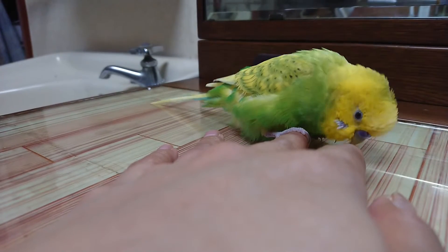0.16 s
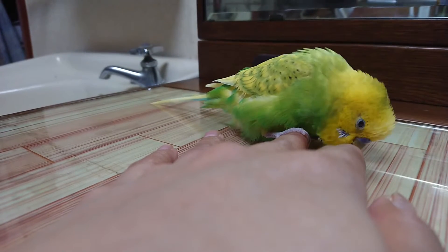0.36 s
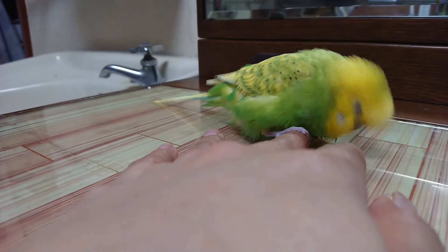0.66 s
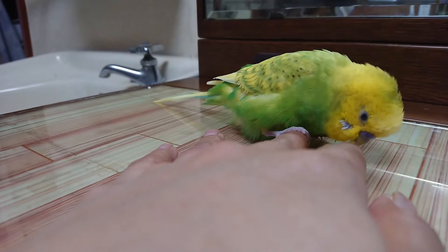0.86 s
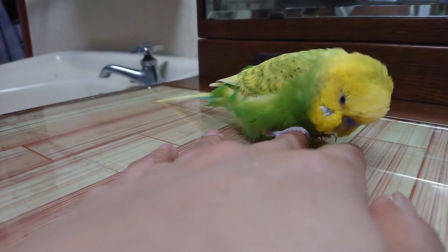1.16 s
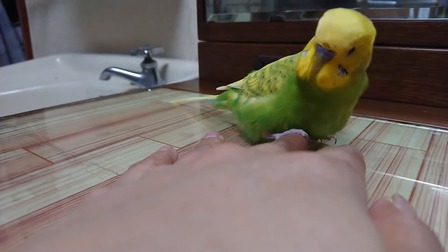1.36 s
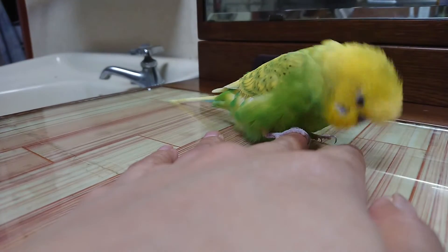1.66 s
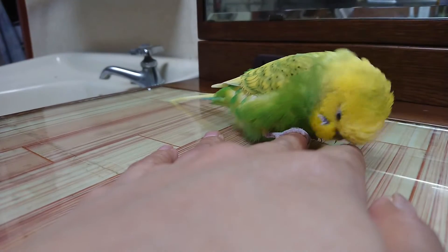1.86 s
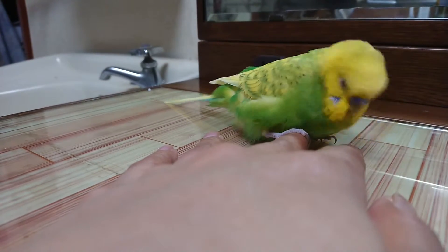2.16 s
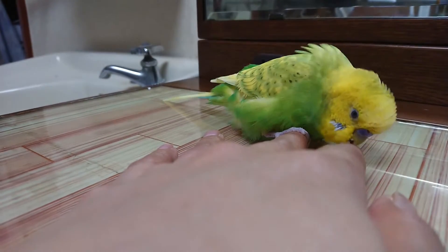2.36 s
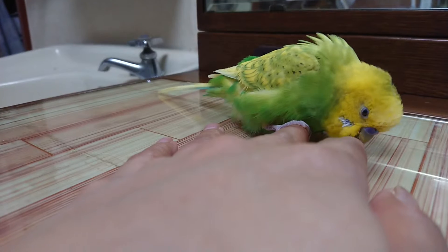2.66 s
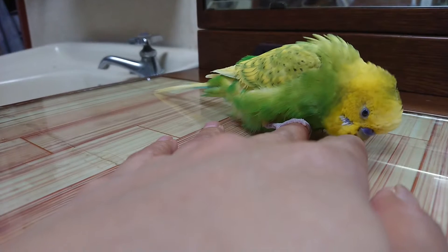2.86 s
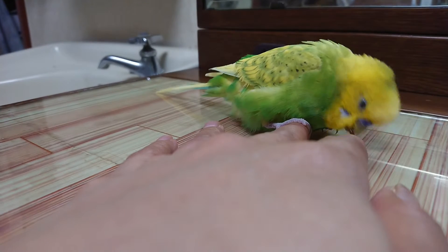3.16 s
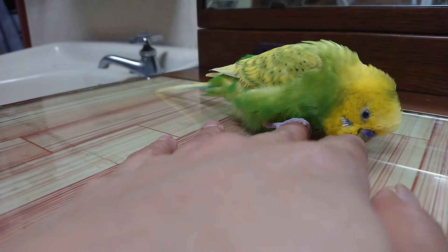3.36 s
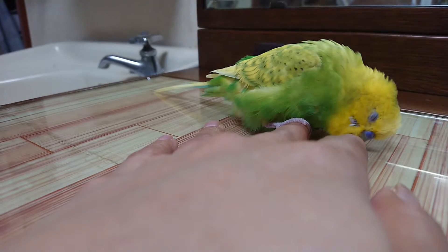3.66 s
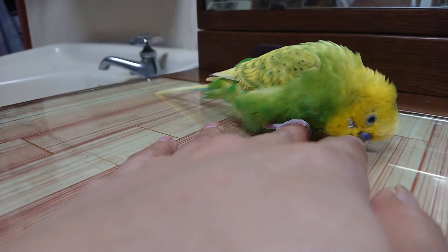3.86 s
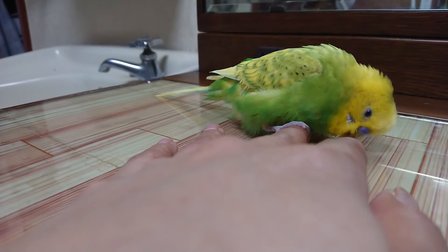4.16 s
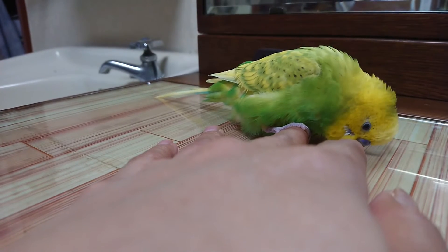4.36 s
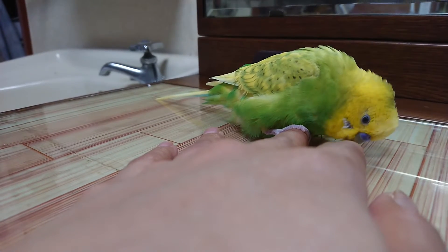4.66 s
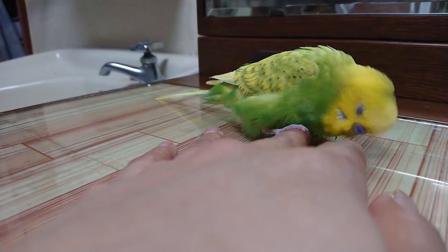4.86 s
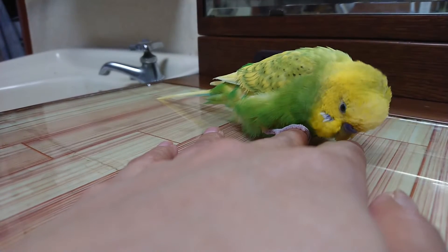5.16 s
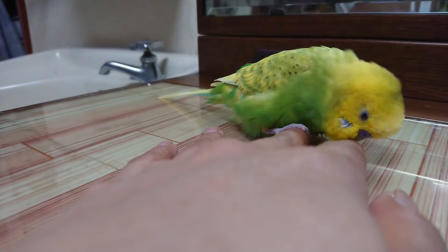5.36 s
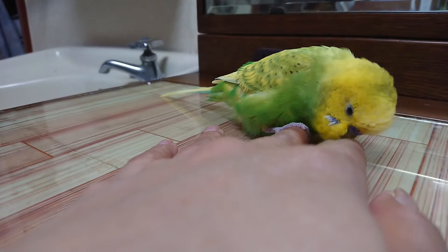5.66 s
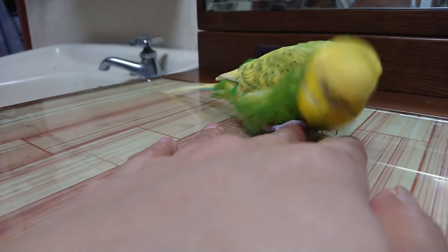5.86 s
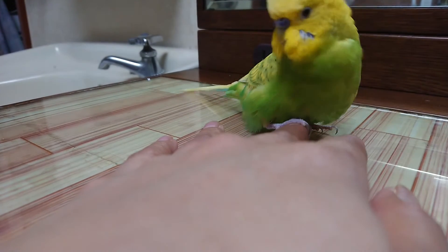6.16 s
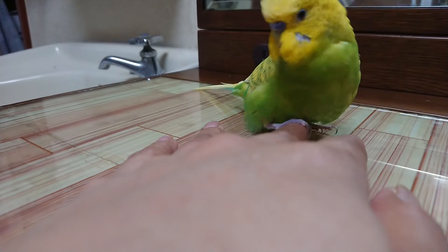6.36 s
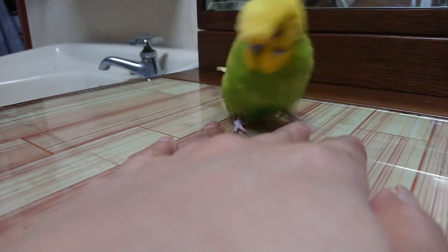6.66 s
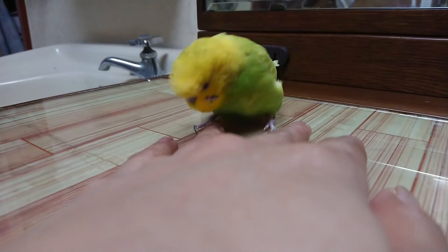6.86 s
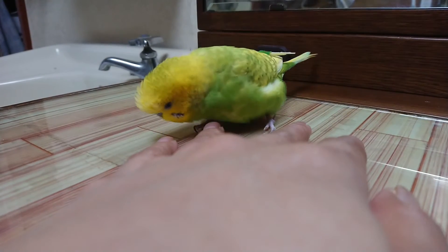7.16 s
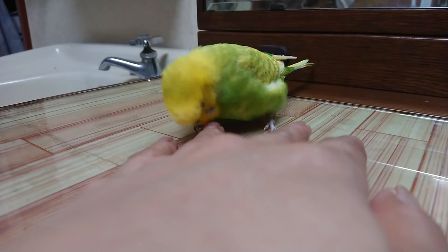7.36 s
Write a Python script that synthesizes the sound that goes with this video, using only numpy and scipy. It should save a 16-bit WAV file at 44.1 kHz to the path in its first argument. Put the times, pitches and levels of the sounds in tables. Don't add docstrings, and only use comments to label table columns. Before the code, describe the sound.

A small hard room, recorded close in stereo, with a budgerigar just to the right. From 0 to 1.5 s there are only tiny, dry nibbling ticks over a low outside rumble, while a faint engine hum rises and then slows. At 1.5 s the bird warbles until about 2.2 s: very fast, throbbing whistled glides, bright and slightly raspy, with a hollow pop. Shorter phrases follow around 2.7-3.1 s and 3.7-4.2 s, with beak clacks between and a brief grainy claw scrape at 3.4 s. From 2.3 s, other birds chirp very faintly, heard only as echo. Light ticking fills 4.4-5.3 s. A quick chatter at 5.4 s leads to two hard, loud clacks near 5.7 s. Dense, tumbling warble then runs on to about 7.1 s, pauses briefly, and ends with a clack and a bright high chirp near 7.5 s. Soft airy noise grows slightly throughout.

```python
import sys
import numpy as np
from scipy import signal
from scipy.fft import rfft, irfft
from scipy.io import wavfile
from scipy.ndimage import uniform_filter1d

SR = 44100
rng = np.random.default_rng(int(sys.argv[2]) if len(sys.argv) > 2 else 0)


def digitize_waveform(pressure):
    field = np.atleast_2d(pressure).T
    bounded = np.clip(field, -1, 1)
    quanta = np.round(bounded * 32767).astype(np.int16)
    wavfile.write(sys.argv[1], SR, quanta)


def invert_db(level):
    return 10 ** (np.asarray(level, dtype=float) / 20)


N = 331191

# t/s, length/ms, shift/semitones, level/dB, swell/dB
DIP_SHAPE = [
    (.02, 4350, 3460, 2875, -9.5),
    (.2, 2700, 2864, 3326, 1.9),
    (.43, 3900, 4500, 4700, -12),
    (.54, 4267, 3702, 3750, -3),
]
DIPS_SUNG = [
    (1.5439, 58, 0.22, -27, 9),
    (2.698, 64, 0.36, -23, 5),
    (3.7107, 65, 0.31, -26, -6),
]
SWOOP_SHAPE = [
    (0, 3760, 2262, 2160, 5.5),
    (.62, 2117, 2756, 3410, 10),
]
SWOOPS_SUNG = [
    (1.601, 35, -0.13, -35.5, 0.5),
    (2.7613, 29.9, -0.19, -32, 3.5),
    (3.7741, 28.6, -0.18, -33.5, 5.5),
    (5.859, 30, 0.34, -35, 4),
    (6.597, 25.5, 0.096, -33, -4),
]
LEAD_SHAPE = [
    (0.09, 3730, 3140, 3900, -1.5),
]
LEADS_SUNG = [
    (1.7244, 26, 0.08, -20, 6),
    (2.892, 27, 0.087, -23, 1.5),
    (3.925, 31, 0.0091, -29.5, 4.5),
]
ZIGZAG_SHAPE = [
    (0, 3270, 2876, 3190, 1),
    (.24, 2267, 2410, 3043, -2.5),
    (.5, 2880, 2750, 3100, 1),
    (.63, 3618, 3450, 3250, 6),
]
ZIGZAGS_SUNG = [
    (2.9221, 64.8, -0.0019, -27, -7.5),
    (3.955, 76, .1, -33, -11.5),
]
STAIR_SHAPE = [
    (0, 2540, 1723, 1853, -8),
    (.19, 1850, 1413, 1450, -6.5),
    (.38, 1660, 1964, 2120, -3),
    (.47, 2138, 2445, 2420, 4),
    (.58, 2250, 1950, 1935, -3),
    (.7, 2355, 2958, 2980, 3.2),
    (.85, 3254, 2914, 2810, 9),
]
STAIRS_SUNG = [
    (2.056, 105.4, -0.86, -29, -8),
    (2.985, 111.5, 0.72, -29, 0),
]
# t/s, length/ms, start f/Hz, end f/Hz, level/dB
LINK_NOTES = [(6.031, 5.9, 2500, 1960, -29), (1.8185, 27.5, 1825, 1223, -29.5),
              (1.8569, 12, 2816, 2947, -14.5), (1.868, 8, 2774, 2424, -9.5), (1.875, 11, 2500, 2826, -19),
              (1.8852, 37, 2791, 2677, -27.5), (1.9176, 23, 2856, 2860, -25.5),
              (1.9346, 46, 3350, 3500, -30.5), (4.0451, 43, 2914, 2887, -29), (4.085, 35, 2874, 3118, -25),
              (5.586, 12, 2464, 3180, -28), (6.137, 13, 2370, 2790, -33.5), (7.4216, 10, 2783, 2710, -27),
              (7.4905, 9.6, 1450, 1310, -33.5)]
# t/s, length/ms, start f/Hz, end f/Hz, level/dB
MORE_LINK_NOTES = [(1.75, 5.4, 3480, 2360, -22), (1.758, 7.3, 1990, 2740, -21.5), (1.767, 13, 2880, 3346, -24.5),
                   (1.7798, 12, 3000, 2665, -17), (1.766, 2.3, 2097, 1400, -29), (1.845, 8.7, 1381, 1970, -29),
                   (6.098, 10, 2030, 2380, -35), (6.1112, 15, 1830, 1640, -36), (6.122, 18.6, 1510, 1250, -37.5),
                   (6.154, 2.8, 2790, 2330, -22), (4.03, 8.2, 1816, 1670, -46.5), (4.057, 5.7, 1385, 1450, -42),
                   (4.066, 28, 1789, 2510, -36.5), (4.092, 17, 2040, 1980, -36),
                   (4.101, 14.5, 2215, 2874, -27.5), (4.118, 20, 3102, 2594, -17),
                   (4.142, 22.2, 2928, 3400, -31.5), (1.721, 4.4, 3500, 3650, -36.5),
                   (2.887, 4.4, 3625, 3730, -44)]
# t/s, length/ms, start f/Hz, end f/Hz, level/dB
EARLY_WARBLE = [(1.7904, 9.9, 3770, 3830, -20), (1.797, 4.2, 3400, 3500, -24.5),
                (1.8, 16.4, 3495, 3830, -17), (1.974, 4.9, 3330, 3270, -22.5),
                (1.982, 13.2, 3380, 2217, -20), (1.991, 21, 2300, 2510, -22.5),
                (2.009, 2.6, 2500, 3500, -30), (2.01, 7.7, 3550, 3500, -19), (2.017, 13, 3480, 2910, -18.5),
                (2.028, 15, 3150, 3230, -26.5), (2.037, 8, 3350, 3736, -20), (2.043, 4.3, 3740, 3500, -16),
                (2.051, 8.6, 3150, 1940, -41.5), (5.418, 9.2, 2850, 1720, -31),
                (5.426, 8.4, 1830, 1650, -32), (5.436, 9.3, 1890, 2500, -27.5),
                (5.444, 7, 2690, 3400, -31.5), (5.454, 12, 3136, 2430, -24), (5.464, 11, 2580, 2980, -26),
                (5.477, 3.9, 2930, 3840, -19), (5.483, 4.1, 3500, 3360, -27), (5.489, 6.7, 2620, 2070, -35),
                (5.496, 14.4, 1523, 1880, -32.5), (5.518, 16, 1585, 1375, -36.5),
                (5.53, 15.4, 1860, 2430, -29.5), (5.547, 5.9, 2470, 2330, -24.5),
                (5.555, 8.8, 2420, 3010, -26.5), (5.562, 10.6, 2824, 2500, -19),
                (5.572, 6.7, 2630, 3070, -28.5), (5.804, 14, 4060, 2950, -30.5),
                (5.813, 9.9, 3000, 3150, -26.5), (5.821, 4.1, 2980, 3480, -25.5),
                (5.838, 31.5, 4074, 3830, -30), (5.857, 4.2, 3970, 3530, -27)]
# t/s, length/ms, start f/Hz, end f/Hz, level/dB
MIDDLE_WARBLE = [(5.997, 7.3, 3160, 3120, -37), (6.003, 8, 3180, 3570, -38), (6.012, 8, 3500, 2650, -39),
                 (6.018, 13.3, 2680, 2500, -22), (6.038, 4.2, 2820, 3500, -26),
                 (6.048, 8.1, 3280, 3060, -29.5), (6.057, 5.2, 3720, 3680, -27),
                 (6.064, 11.5, 3565, 3620, -35), (6.075, 6.2, 3440, 3350, -28),
                 (6.139, 11.7, 1184, 1395, -35.5), (6.16, 3, 2280, 2240, -26), (6.166, 11, 2105, 1880, -31),
                 (6.177, 10, 2124, 2340, -28), (6.187, 5.1, 2350, 2760, -36),
                 (6.204, 2.3, 2500, 2940, -32.5), (6.218, 26.6, 1450, 1210, -34.5),
                 (6.238, 14.8, 1246, 1650, -34), (6.256, 12.4, 1400, 1556, -36.5),
                 (6.268, 11, 2200, 1960, -33), (6.279, 15.6, 2500, 2670, -19.5),
                 (6.296, 12, 1885, 1840, -34), (6.307, 9.6, 2010, 2450, -26.5),
                 (6.319, 30, 1824, 1200, -41.5), (6.368, 4.2, 1600, 1580, -37),
                 (6.375, 16, 1450, 1730, -38.5), (6.39, 6.4, 2220, 2400, -28),
                 (6.399, 12, 2580, 2620, -19.5), (6.413, 9.8, 1837, 2070, -28.5),
                 (6.426, 15.7, 1994, 2800, -27), (6.443, 2.8, 2750, 2670, -20),
                 (6.456, 12, 3240, 2810, -31), (6.539, 13.5, 4310, 2880, -33),
                 (6.548, 3, 2770, 2700, -17.5), (6.55, 9.7, 2670, 3040, -19.5),
                 (6.562, 7.4, 4180, 4550, -43.5), (6.573, 15.3, 4100, 3645, -33),
                 (6.586, 8.5, 3930, 3810, -30)]
# t/s, length/ms, start f/Hz, end f/Hz, level/dB
LATE_WARBLE = [(6.727, 11, 3280, 3220, -43), (6.739, 4.8, 3210, 3500, -34), (6.75, 2.6, 2500, 2500, -30),
               (6.755, 9.2, 2515, 2300, -20), (6.762, 5.2, 2180, 1540, -32), (6.766, 3.8, 3800, 3500, -33),
               (6.77, 2.9, 2800, 3400, -20), (6.777, 5.9, 3127, 2970, -22.5),
               (6.783, 6.7, 2850, 3320, -28.5), (6.788, 17, 4010, 3630, -23),
               (6.797, 18, 3590, 3640, -29.5), (6.815, 13, 3470, 2593, -41.5),
               (6.822, 6.3, 1880, 1780, -32.5), (6.829, 8.6, 1880, 2110, -37), (6.845, 14, 1640, 1360, -31),
               (6.858, 15, 1980, 1856, -31), (6.869, 9.6, 2300, 2610, -26), (6.879, 17, 2230, 2155, -31),
               (6.891, 19, 2590, 2810, -29.5), (6.92, 5.8, 2900, 4150, -31), (6.934, 26, 1494, 1202, -37.5),
               (6.943, 16, 1215, 1450, -31), (6.954, 14, 1450, 1245, -30.5), (6.968, 26, 1277, 1516, -34),
               (6.980, 12.3, 1462, 1450, -34), (6.996, 10, 2080, 1950, -37.5), (7.006, 13, 2500, 2500, -23),
               (7.019, 24, 1790, 1975, -33.5), (7.036, 8, 2010, 2690, -29), (7.047, 7.2, 2560, 2840, -25),
               (7.066, 3, 2760, 3320, -29.5), (7.070, 9.5, 2830, 3000, -35.5),
               (7.442, 4.4, 2190, 2420, -23), (7.447, 9.8, 2500, 2680, -20.5),
               (7.455, 15.7, 2778, 2847, -29.5), (7.473, 8, 3594, 3723, -19.5),
               (7.480, 6.9, 3880, 3520, -11), (7.486, 7.1, 3800, 3800, -29.5)]


def phrases():
    notes = []
    for s, ms, start_hz, end_hz, level_db in LINK_NOTES + MORE_LINK_NOTES + EARLY_WARBLE + MIDDLE_WARBLE + LATE_WARBLE:
        notes.append((s, ms, start_hz, np.sqrt(start_hz * end_hz), end_hz, level_db))
    syllables = (
        (DIP_SHAPE, DIPS_SUNG), (SWOOP_SHAPE, SWOOPS_SUNG), (LEAD_SHAPE, LEADS_SUNG),
        (ZIGZAG_SHAPE, ZIGZAGS_SUNG), (STAIR_SHAPE, STAIRS_SUNG))
    for shape, sung in syllables:
        ends = [row[0] for row in shape[1:]] + [1]
        for s, ms, semitones, level_db, swell_db in sung:
            for (share, *pitch, accent_db), end in zip(shape, ends):
                shifted = np.array(pitch) * 2 ** (semitones / 12)
                length_ms = max(end - share, .05) * ms
                note_db = level_db + accent_db + swell_db * (share - .5)
                notes.append((s + share * ms / 1000, length_ms, *shifted, note_db))
    return notes


def windpipe_db(hz, open_db):
    def near(centre_hz, spread):
        return np.exp(-(np.log(hz / centre_hz) / spread) ** 2)

    first = near(2700, 0.27)
    gain_db = 17 * first + (1 - first) * open_db
    return gain_db + 6 * near(7500, .12) + 12 * near(14500, .1)


# t/s, beak opening towards the microphone as overtone level/dB, rasp level/dB
HEAD = [(1.6, 0, -3.5), (1.76, 5, -7), (1.92, 6.5, 4), (2, 9, -4), (2.1, 3.5, -8), (2.8, 6, -1.5),
        (3.95, 8, 3), (4.06, 8, 12), (4.15, 11, -15.5), (5.5, 3.5, -5.5), (6.1, -5, -4), (7.05, -8, -7),
        (7.45, -0.5, -4.5)]


def song():
    edge_s = .0025
    open_db, rasp_db = in_time(HEAD)
    rasp = invert_db(rasp_db)
    notes = phrases()
    voice, strain = np.zeros(N), np.zeros(N)
    beat = 2 * np.pi * np.cumsum(175 * np.exp(.3 * drift(40))) / SR
    uneven, broken = drift(34), drift(240)
    haze = invert_db(rasp_db - 21) * drift(450)
    flutter = invert_db(11 * np.tanh(0.23 * rasp * drift(250))) + haze
    waver = np.exp(.012 * np.cos(beat) + .008 * rasp * drift(300))

    for (s, ms, *pitch, level_db), chance in zip(notes, rng.normal(size=(len(notes), 3))):
        at = int((s - edge_s / 2) * SR)
        n = min(int((ms / 1000 + edge_s) * SR), N - at)
        now = slice(at, at + n)
        u = (np.arange(n) + .5) / n
        glide = np.polyfit([0, .5, 1], np.log(pitch), 2)
        hz = np.exp(np.polyval(glide, u)) * waver[now]
        phase = 2 * np.pi * np.cumsum(hz) / SR + 3 * chance[0]
        tone = np.sin(phase) * np.exp(2 * (u - .5) * np.tanh(np.log(hz[-1] / hz[0])))
        for k, over_db in ((2, -34.0), (3, -46.5), (4, -62.0)):
            gain_db = over_db + windpipe_db(k * hz, open_db[now])
            gain_db = gain_db + 3.0 * chance[1 + k % 2] + 6 * broken[now]
            tone = tone + invert_db(gain_db) * np.sin(k * phase) * (k * hz < 16000)
        to_edge = np.minimum(u, 1 - u) * n / (edge_s * SR)
        edge = np.sin(np.pi / 2 * np.clip(to_edge, 0, 1)) ** 2
        depth = np.clip(.3 + .025 * (level_db + 25) + .2 * uneven[now], .05, .95)
        throb = 1 + depth * np.sin(beat[now])
        shape = invert_db(level_db + 0.89) * np.sin(np.pi * u) ** 0.36 * edge * throb * flutter[now]
        voice[now] += shape * tone
        strain[now] += shape * (hz / 3300) ** 2

    lingering = signal.lfilter([.001], [1, -.999], np.abs(strain))
    breath = rng.standard_normal(N) * lingering * rasp
    hiss = invert_db(-27) * cut(breath, 3, [4300, 10000], "band")
    spray = rng.standard_normal(N) * uniform_filter1d(np.abs(strain), size=500) * invert_db(open_db + rasp_db / 2)
    sizzle = invert_db(-41 + 3 * drift(18)) * cut(spray, 2, [12500, 15800], "band")
    return voice + hiss + sizzle


def strikes(times, levels_db, modes, spread_db):
    out = np.zeros(N + 99)
    first = (np.array(times) * SR).astype(int)
    chance = rng.normal(size=(len(first), len(modes) + 1))
    second = first + np.clip(22 + 8 * chance[:, -1], 6, 60).astype(int)
    for k, (hz, width, mode_db) in enumerate(modes):
        clicks = np.zeros(N + 99)
        size = invert_db(levels_db[k] + mode_db + spread_db * chance[:, k])
        clicks[first] = .45 * size
        clicks[second] -= size
        out += resonate(clicks, hz, width) * (-1) ** k
    return out[:N]


# t/s, peak level/dB, treble level/dB against the rest
CLACKS = [(1.539, -44, -30.5), (2.451, -34.5, -8.5), (3.408, -36.5, -26), (3.531, -38, -14),
          (5.142, -34.5, -9.5), (5.4, -44, -71), (5.694, -21, -23), (5.7, -8.5, -14), (5.718, -24, -8),
          (5.747, -9.5, -9), (6.793, -30.5, -28), (7.41, -28, -47.5)]
# f/Hz, width/Hz, level/dB
CLACK_MODES = [(1000, 350, -5), (1350, 500, -6), (2500, 750, 3), (3300, 450, -3), (5290, 600, -6),
               (7200, 1100, -10), (11500, 2500, -19), (15300, 1200, -27)]


def clacks():
    s, peak_db, top_db = np.transpose(CLACKS)
    levels = []
    for hz, _, _ in CLACK_MODES:
        treble_db = (hz > 4500) * (top_db + 10.5)
        hollow_db = (hz < 1800) * -.3 * (top_db + 19.5)
        levels.append(peak_db + treble_db + hollow_db)
    return strikes(s + 0.0005, levels, CLACK_MODES, spread_db=2.0)


# t/s, peak level/dB
POPS = [
    (1.641, -25.5),
    (2.8, -31.5),
    (3.81, -28),
    (5.9, -29.5),
    (6.634, -32),
]
# f/Hz, width/Hz, level/dB
POP_MODES = [(896, 860, -27), (1450, 210, 1.5), (2500, 470, 2), (3500, 560, 1.5), (5290, 2600, -17.5),
             (6500, 150, -14), (11100, 5200, -23)]


def pops():
    s, peak_db = np.transpose(POPS)
    return strikes(s + 0.0005, [peak_db] * len(POP_MODES), POP_MODES, spread_db=1.5)


# t/s, peak level/dB
TICKS = [(0.2003, -55.5), (0.3075, -56.5), (0.598, -61.5), (0.6471, -58.5), (0.8581, -55), (0.9894, -58),
         (1.024, -60.5), (1.0814, -49), (1.1108, -51), (1.2118, -63), (1.2219, -50.5), (1.296, -54),
         (2.2593, -49), (2.5514, -57), (3.1298, -53.5), (4.44, -65), (4.472, -67), (4.675, -67),
         (4.7487, -62), (4.85, -59), (4.814, -63.5), (4.8259, -60), (4.8745, -59.5), (4.9127, -49.5),
         (4.9564, -60), (5.0085, -61.5), (5.0823, -52), (0.0418, -63), (0.4998, -69), (6.639, -39),
         (0.678, -69), (2.405, -61), (3.357, -63.5), (4.585, -72), (4.697, -63), (4.977, -56.5),
         (5.022, -65.5), (5.25, -63), (5.325, -58.5), (6.9229, -51.5)]
# f/Hz, width/Hz, level/dB
TICK_MODES = [(2900, 700, 2), (5300, 900, -4), (7150, 900, -5), (11000, 2500, -21), (15300, 1200, -18)]


def nibbling():
    s, peak_db = np.transpose(TICKS)
    ticks = strikes(s, [peak_db + 10] * len(TICK_MODES), TICK_MODES, spread_db=3)
    per_second = 70 * invert_db(8 * drift(4))[99:]
    s = np.flatnonzero(rng.random(N - 99) < per_second / SR) / SR
    crackle = strikes(s, [-68 + 0 * s] * len(TICK_MODES), TICK_MODES, spread_db=5.5)
    return ticks + crackle


def scrape():
    start_s, level_db, fade_db_per_s = 3.405, -43.5, 170
    since = np.arange(N) / SR - start_s
    fade = (since > 0) * invert_db(level_db - fade_db_per_s * np.abs(since))
    grains = rng.standard_normal(N) * invert_db(3.6 * drift(140)) * fade
    return cut(grains, 3, [3000, 5300], "band")


def beak_and_claw():
    return cut(clacks() + pops() + nibbling() + scrape(), 4, 680, "high")


# t/s, delay of the left side/samples, left minus right level/dB
SIDE = [
    (3.88, 1, -21),
    (3.94, 1, -11),
    (4.6, 1, -11),
    (5.7, 1, -21),
    (6, 10, -20),
    (7.1, 11, -18),
    (7.4, 12, -11),
]


def two_sides(bird):
    lag, left_db = in_time(SIDE)
    samples = np.arange(N)
    left = invert_db(left_db) * np.interp(samples - lag, samples, bird)
    left = left + invert_db(-16) * cut(bird, 2, 1200)
    return np.array([left, bird])


def room(x, t60, onset_s, cut_hz):
    t = np.arange(SR // 2) / SR
    echoes = rng.standard_normal((2, len(t))) * invert_db(-60 * t / t60) * np.clip(t / onset_s, 0, 1)
    echoes = cut(echoes, 1, cut_hz)
    echoes = echoes / np.sqrt((echoes ** 2).sum(axis=1, keepdims=True))
    return signal.fftconvolve(x[None], echoes, axes=1)[:, :N]


# t/s, f/Hz, level/dB
FAR_CHIRPS = [(2.33, 2090, -61.5), (2.469, 1560, -62.5), (2.629, 2350, -60.5), (3.58, 3600, -65.5),
              (4.321, 1603, -64), (4.46, 2207, -64), (4.629, 3530, -63), (4.701, 2163, -63),
              (4.831, 2376, -60), (4.992, 2460, -60.5), (5.15, 2410, -66.5), (5.31, 2264, -61.5),
              (7.107, 3740, -59.5), (2.38, 2870, -69), (2.5, 2334, -64), (2.635, 1970, -65.5),
              (3.14, 1414, -61.5), (3.211, 2560, -66), (3.279, 1970, -63.5), (3.31, 1656, -73.5),
              (3.41, 1630, -67), (3.55, 2190, -71), (3.568, 3100, -66), (3.65, 1995, -63),
              (4.859, 1706, -66.5), (4.981, 1760, -66), (5.139, 3870, -67.5), (5.3, 1750, -62)]


def far_birds():
    out, n = np.zeros(N), int(.06 * SR)
    u, waver = np.arange(n) / n, drift(165)
    for s, hz, level_db in FAR_CHIRPS:
        at = int(s * SR)
        phase = 2 * np.pi * np.cumsum(hz * (1 + .06 * waver[at:at + n])) / SR
        out[at:at + n] += invert_db(level_db) * np.sin(np.pi * u ** .35) * np.sin(phase)
    return room(out, t60=0.3, onset_s=0.006, cut_hz=4000) * invert_db([[-4], [0]])


# t/s, f/Hz, level/dB
FIRING = [(.6, 162, -73.5), (1, 168, -67), (1.4, 174, -84.5), (1.85, 170, -61.5), (2.2, 140, -65),
          (2.8, 103, -58), (3.1, 88, -70.5), (3.7, 90, -74.5), (4, 105, -69.5), (4.5, 122, -65),
          (5.2, 104, -82.5), (5.7, 101, -62), (6.2, 95, -82.5), (7.4, 98.7, -66.5)]
# t/s, f/Hz, level/dB
DRONE = [
    (2.2, 66, -70),
    (3.3, 66.14, -57.5),
    (4.599, 71.73, -69),
    (6.002, 69.95, -64.5),
]
# t/s, f/Hz, level/dB
WHINES = [
    [(.8, 323.4, -82), (1.0, 340, -80.5), (1.3, 356, -63.5), (1.53, 362, -76)],
    [(2.8, 293.4, -64.5), (3.1, 266, -72.5), (3.7, 262.8, -67), (5.4, 222.3, -90.5)],
]


def engine():
    out, t = np.zeros(N), np.arange(N) / SR
    for rows in [FIRING, DRONE] + WHINES:
        hz, level_db = in_time(rows)
        fade = np.clip(np.minimum(t - rows[0][0], rows[-1][0] - t) / 0.098, 0, 1)
        phase = 2 * np.pi * np.cumsum(hz * (1 + .014 * drift(10))) / SR
        out += np.sqrt(2) * fade * invert_db(level_db + 2.5 * drift(5)) * np.sin(phase)
    return out * invert_db([[-3.5], [2.5]])


BACK_LEFT_DB = -7.5
# f/Hz, likeness/0 to 1
LIKENESS = [(60, 0.89), (290, 0.27), (640, 0.55), (1400, 0.13), (15000, .05)]


def noise(spectrum):
    hz = np.maximum(np.fft.rfftfreq(N + 9, 1 / SR), 5)
    mid, side = rfft(rng.standard_normal((2, N + 9))) * invert_db(at_hz(spectrum, hz))
    alike = np.clip(at_hz(LIKENESS, hz), 0, 1)
    pair = np.sqrt(1 + alike) * mid + np.sqrt(1 - alike) * side * [[1], [-1]]
    pair = irfft(pair, N + 9)[:, :N] * invert_db([[BACK_LEFT_DB], [0]])
    return pair / pair.mean(axis=0).std()


# t/s, rumble level/dB, air level/dB
BACK = [
    (0, -70.5, -78.5),
    (.95, -67.5, -75),
    (1.2, -65.5, -69.5),
    (3, -63, -70.5),
    (5.5, -65, -66),
    (7.51, -68, -65),
]
# f/Hz, level/dB per Hz
RUMBLE = [(25, -57.5), (45, -10), (68, 2.5), (110, 3.5), (200, -7), (290, -5.5), (520, -17.5), (900, -42)]
# f/Hz, level/dB per Hz
AIR = [(260, -32.5), (500, -1), (1000, 2), (2700, -5), (4200, -18.5), (7500, -34.5), (12400, -38),
       (13300, -87.5)]


def background():
    rumble_db, air_db = in_time(BACK)
    rumble = invert_db(rumble_db) * noise(RUMBLE)
    air = invert_db(air_db - 2.5 + 1.2 * drift(6)) * noise(AIR)
    murmur = resonate(rng.standard_normal(N), hz=1035, width=110)
    murmur = invert_db(air_db - 7) * murmur / murmur.std() * invert_db([[BACK_LEFT_DB], [0]])
    return cut(rumble + air + murmur, 12, 12900)


def drift(rate_hz):
    r = np.exp(-2 * np.pi * rate_hz / SR)
    slow = signal.lfilter([1], [1, -2 * r, r * r], rng.standard_normal(N + 9000))[9000:]
    return slow / slow.std()


def in_time(rows):
    s, *columns = np.transpose(rows)
    return [np.interp(np.arange(N) / SR, s, c) for c in columns]


def at_hz(points, hz):
    point_hz, values = np.transpose(points)
    return np.interp(np.log(hz), np.log(point_hz), values)


def resonate(x, hz, width):
    r, w = np.exp(-np.pi * width / SR), 2 * np.pi * hz / SR
    return signal.lfilter([np.sin(w)], [1, -2 * r * np.cos(w), r * r], x + 1e-18)


def cut(x, order, hz, kind="low"):
    return signal.sosfilt(signal.butter(order, hz, kind, fs=SR, output="sos"), x)


def scene():
    bird = song() + beak_and_claw()
    nearby = room(bird, t60=.09, onset_s=.002, cut_hz=13000) * invert_db([[-23], [-19.5]])
    walls = room(bird, t60=.31, onset_s=.012, cut_hz=3800) * invert_db([[-26], [-23]])
    return two_sides(bird) + nearby + walls + far_birds() + engine() + background()


def low_pass(x):
    return signal.sosfilt(signal.butter(12, 15900, fs=SR, output="sos"), x)


def record(dry):
    mix = cut(dry, 2, 16000)
    return low_pass(mix)


dry = scene()
out = record(dry)
digitize_waveform(out)
```